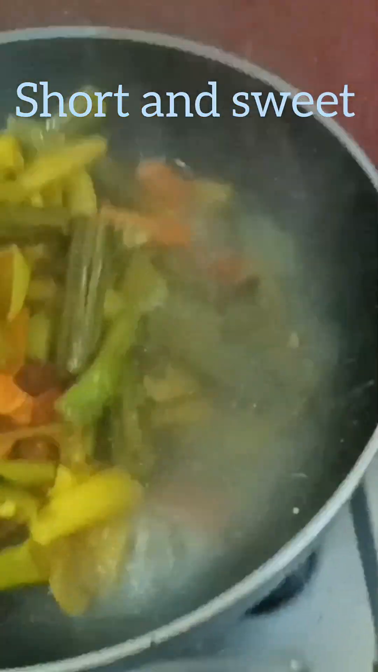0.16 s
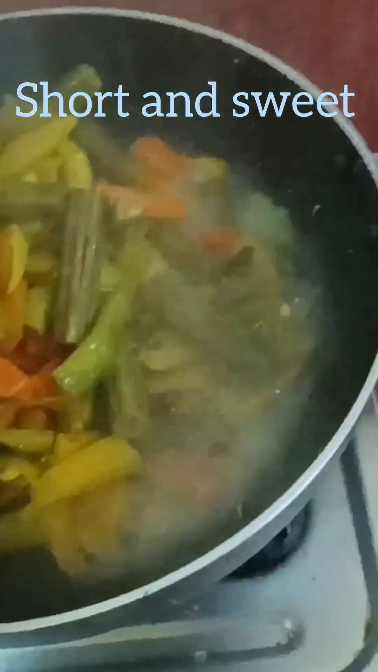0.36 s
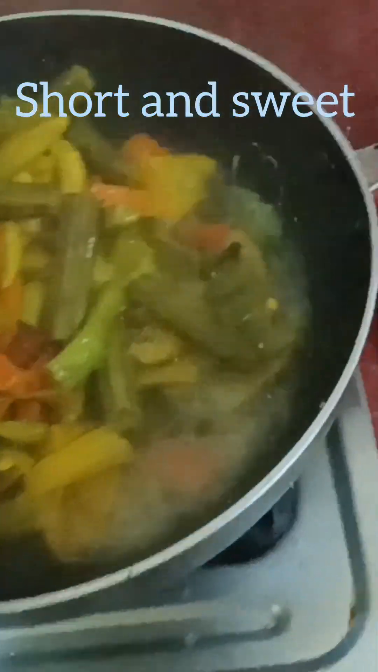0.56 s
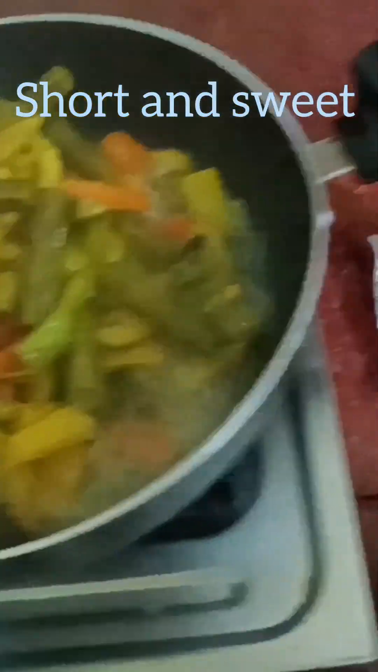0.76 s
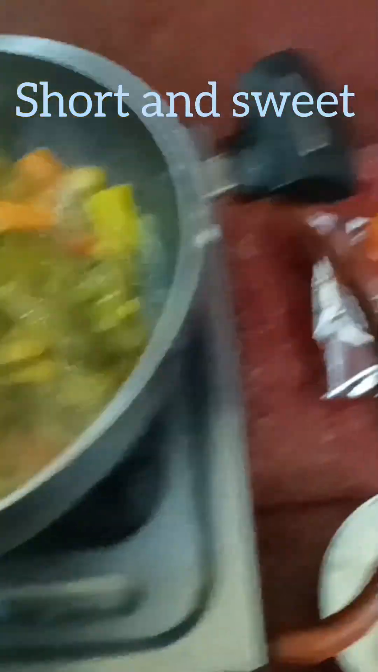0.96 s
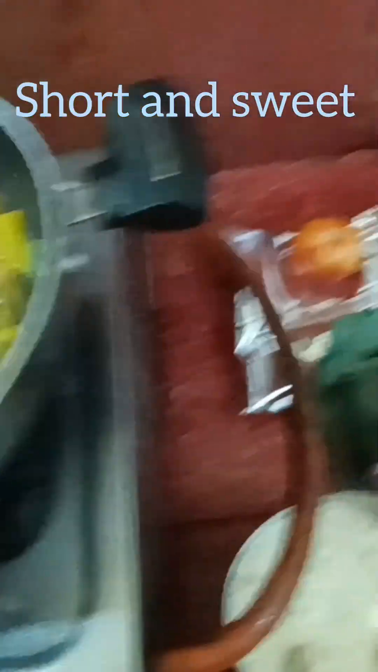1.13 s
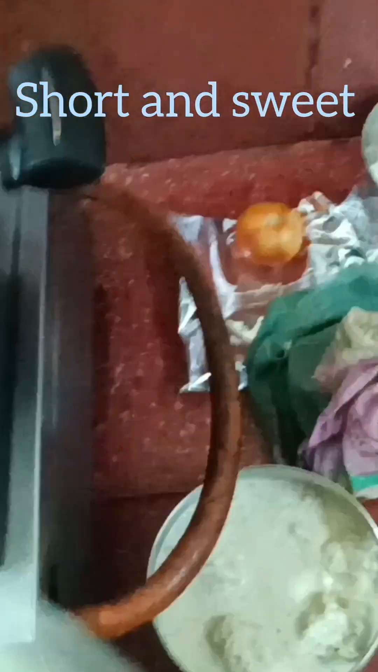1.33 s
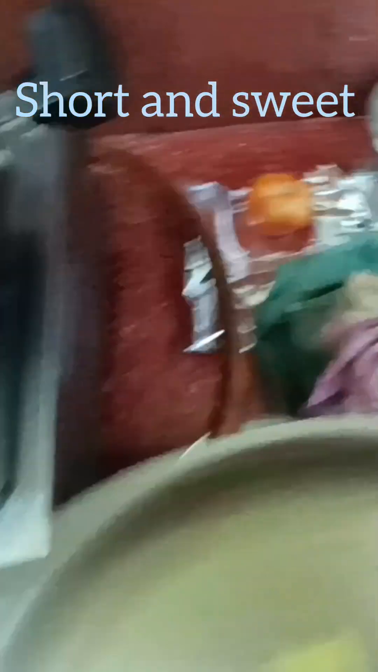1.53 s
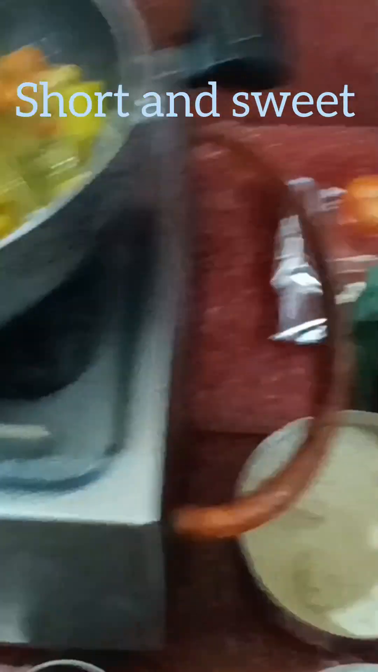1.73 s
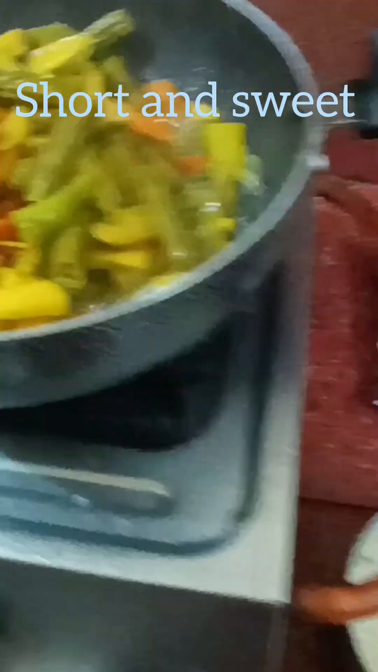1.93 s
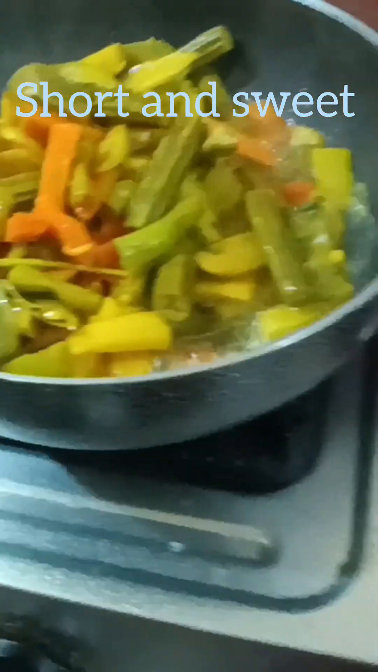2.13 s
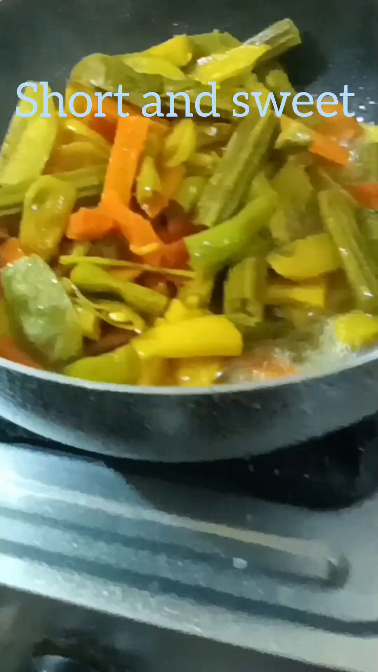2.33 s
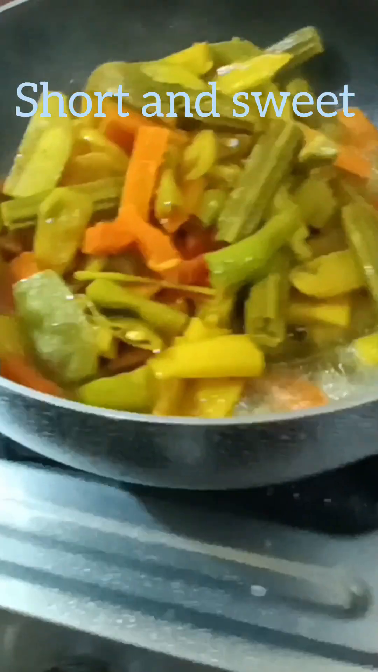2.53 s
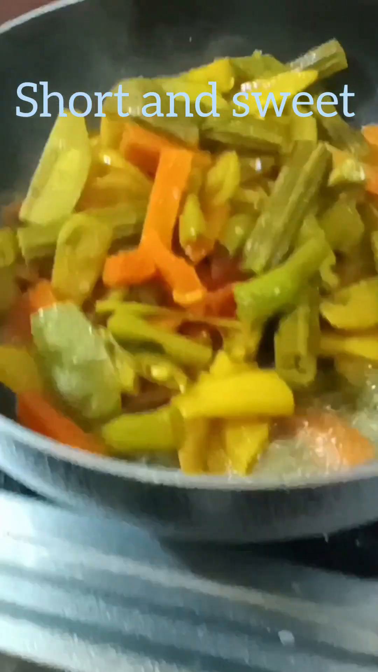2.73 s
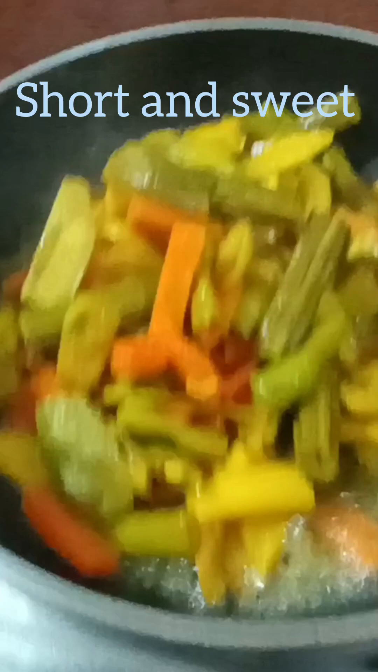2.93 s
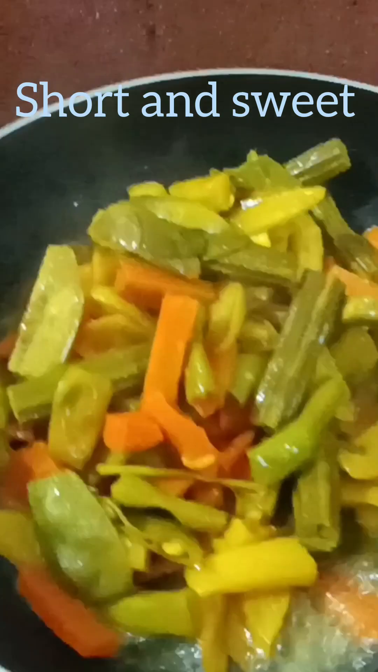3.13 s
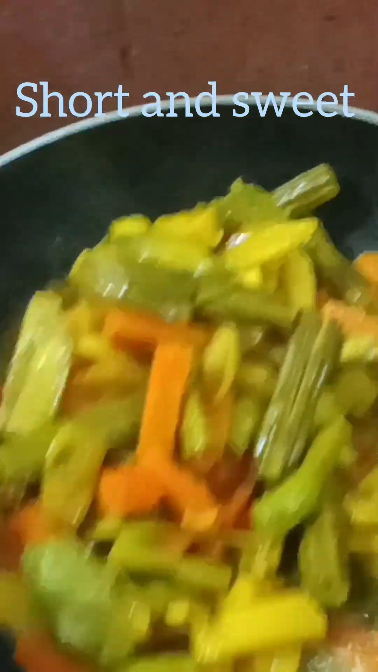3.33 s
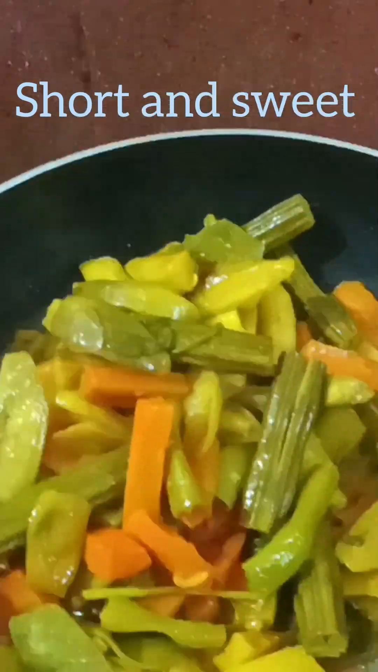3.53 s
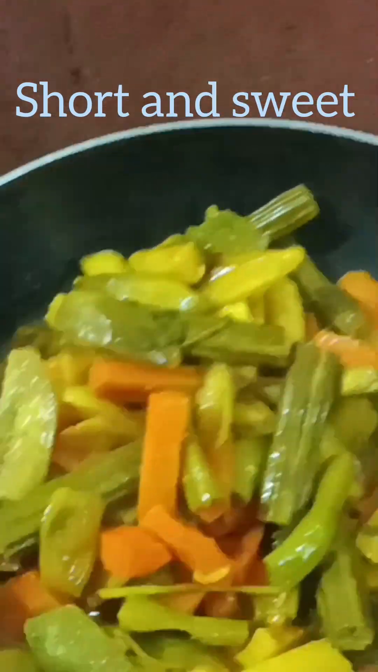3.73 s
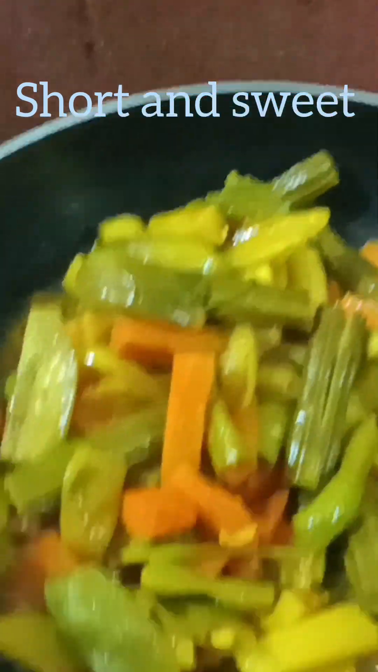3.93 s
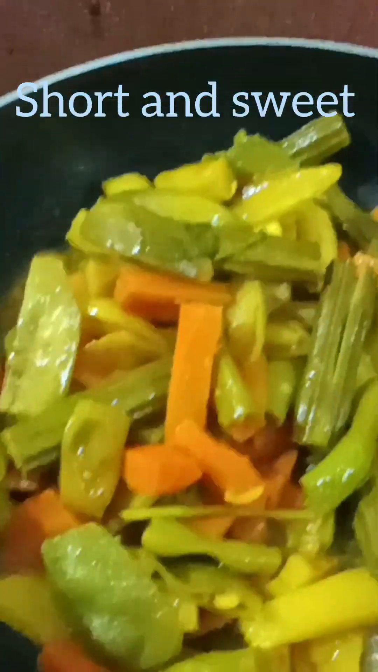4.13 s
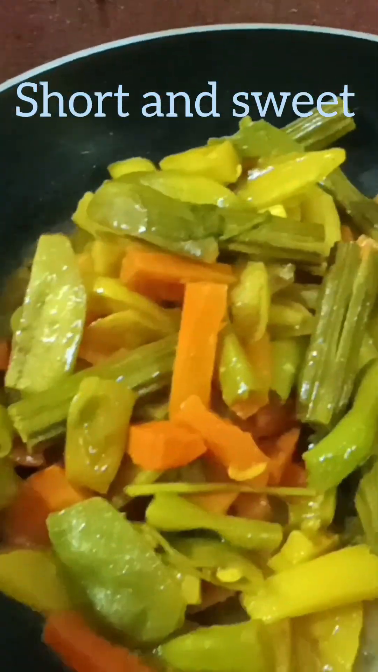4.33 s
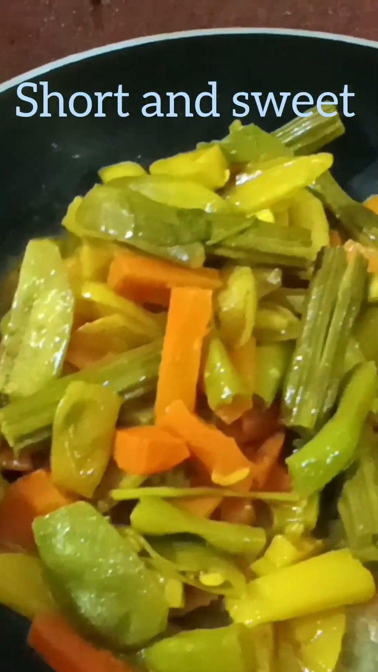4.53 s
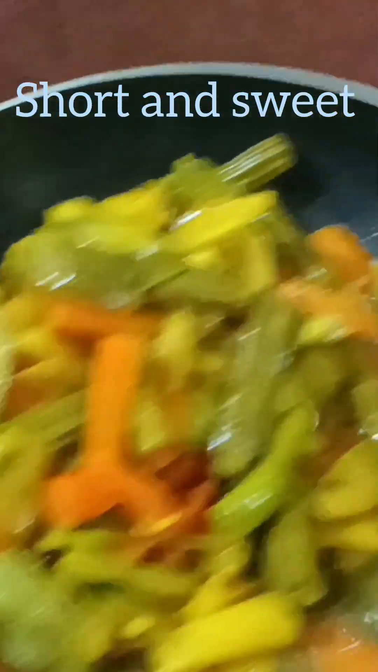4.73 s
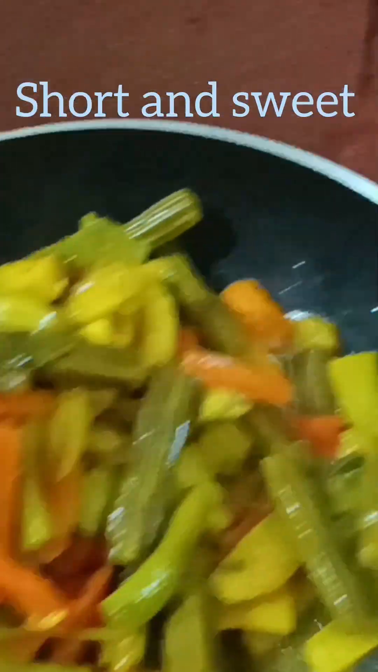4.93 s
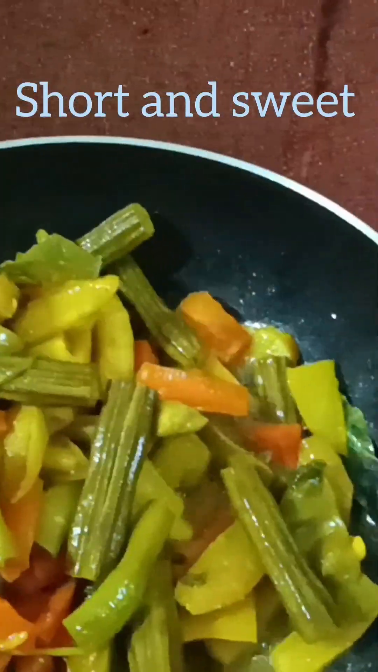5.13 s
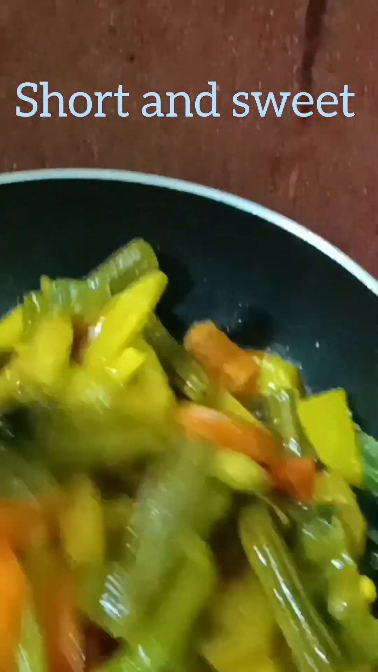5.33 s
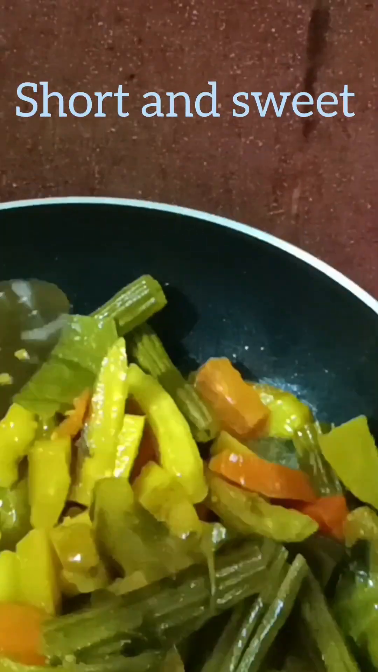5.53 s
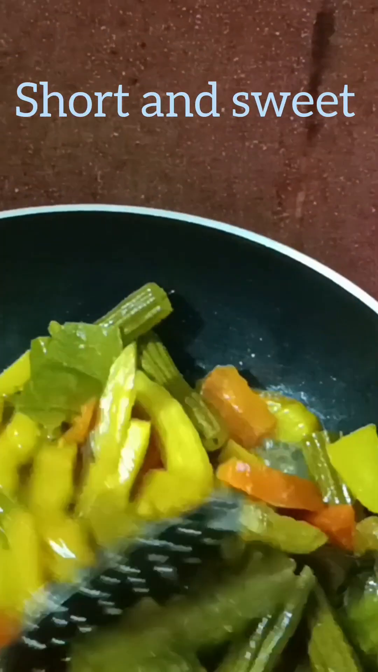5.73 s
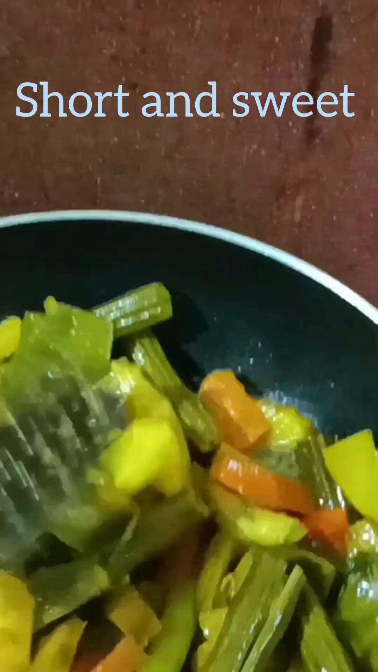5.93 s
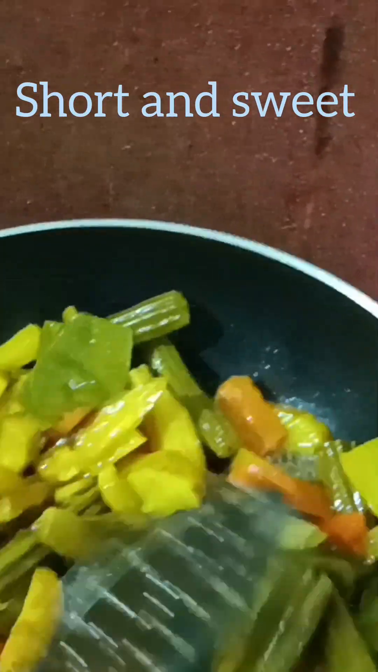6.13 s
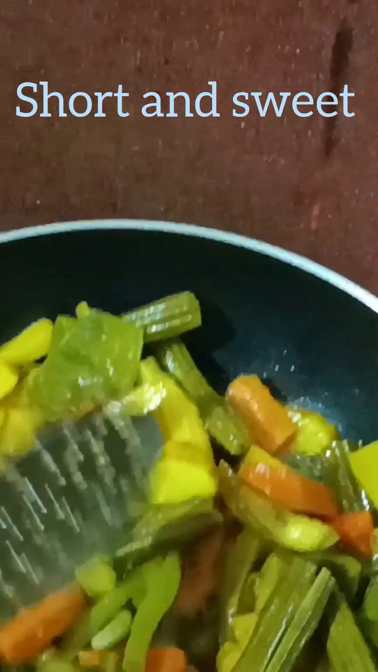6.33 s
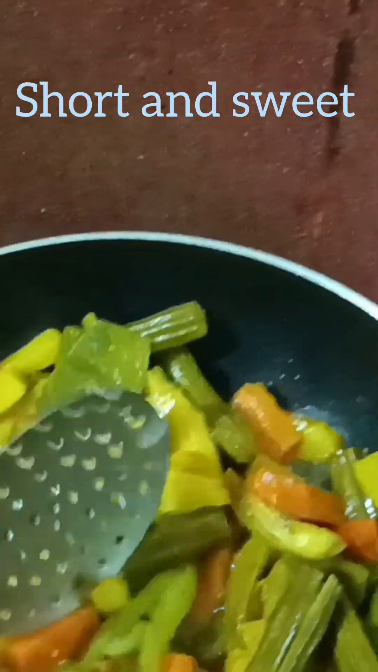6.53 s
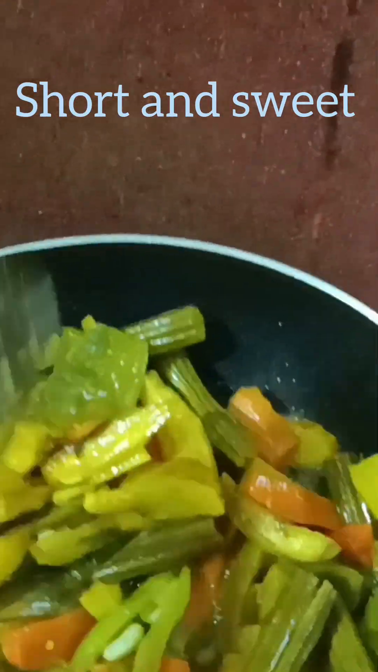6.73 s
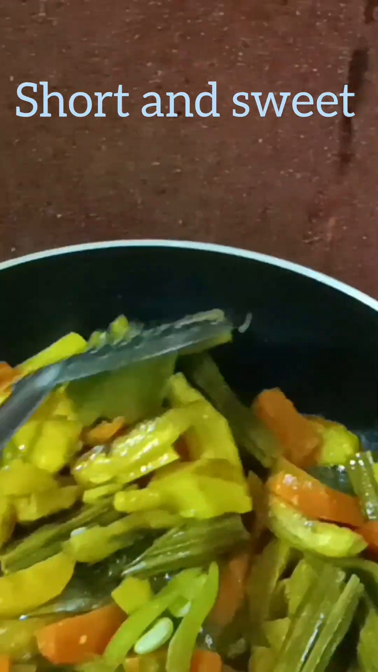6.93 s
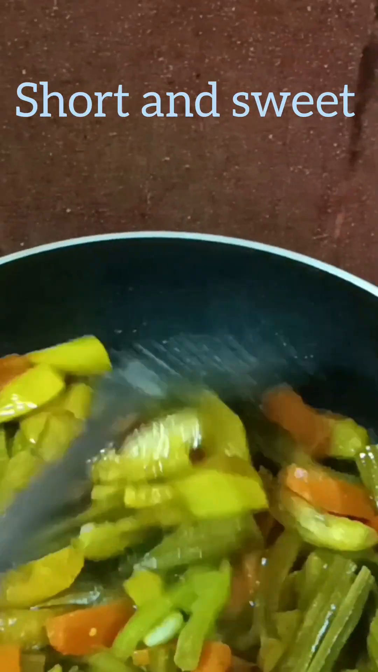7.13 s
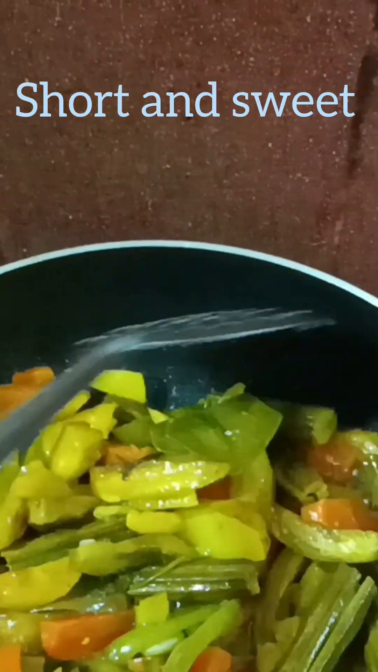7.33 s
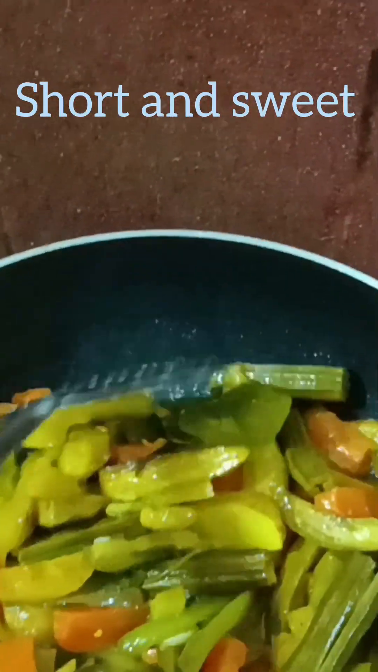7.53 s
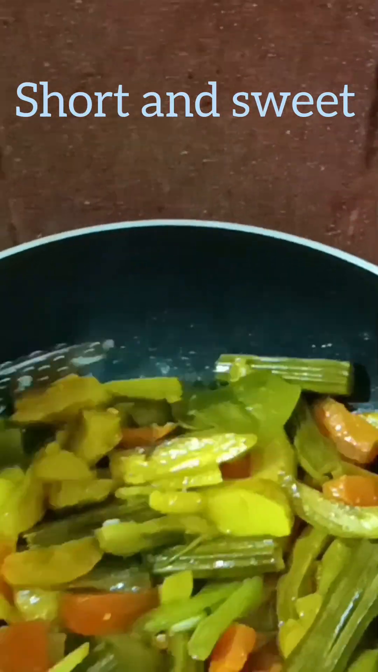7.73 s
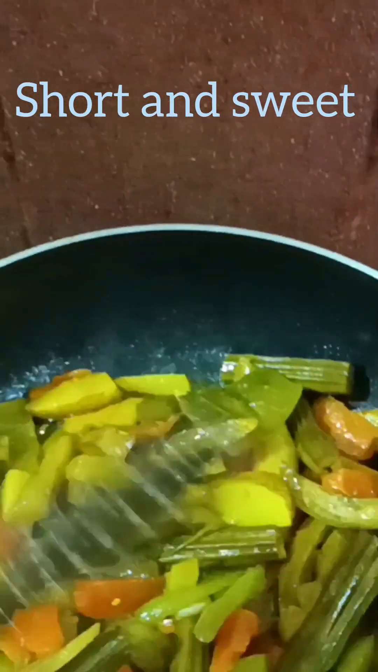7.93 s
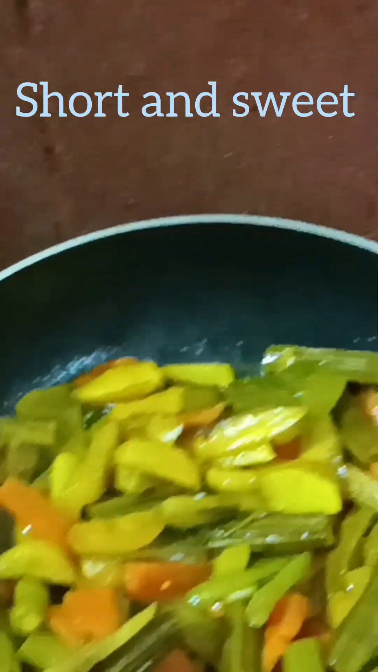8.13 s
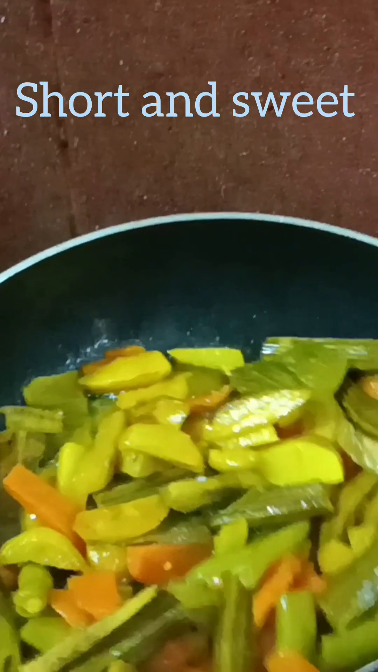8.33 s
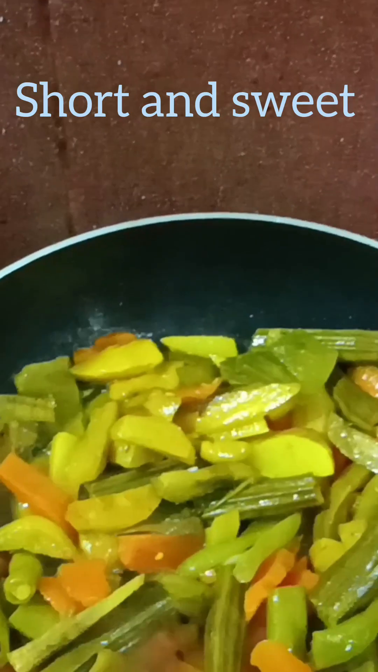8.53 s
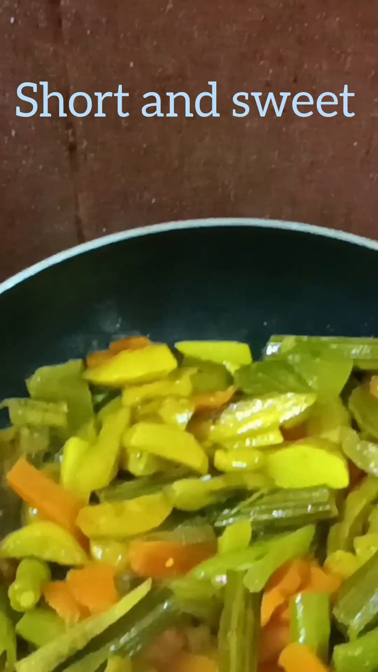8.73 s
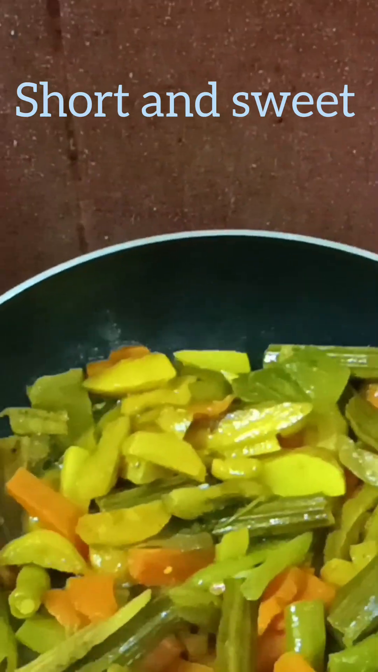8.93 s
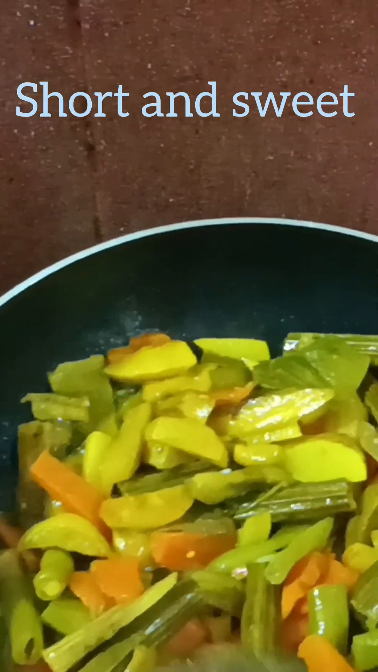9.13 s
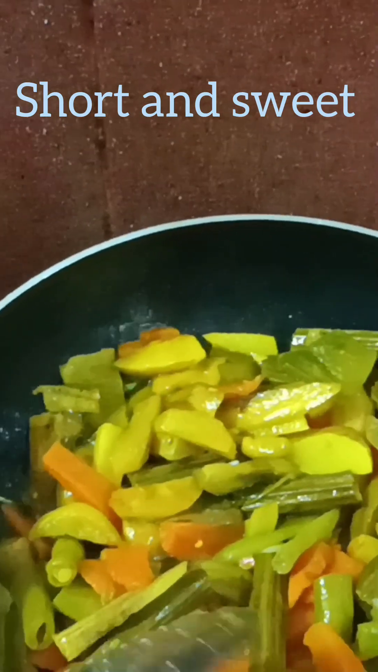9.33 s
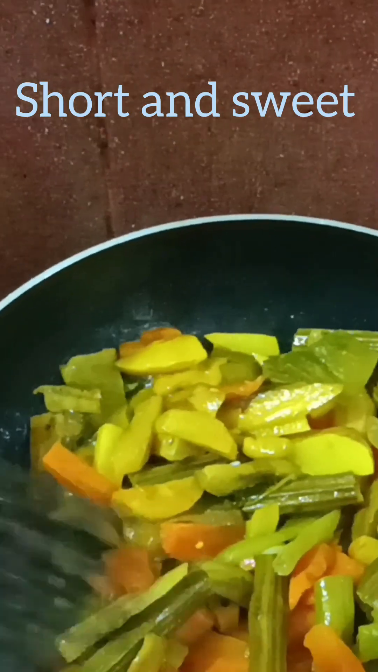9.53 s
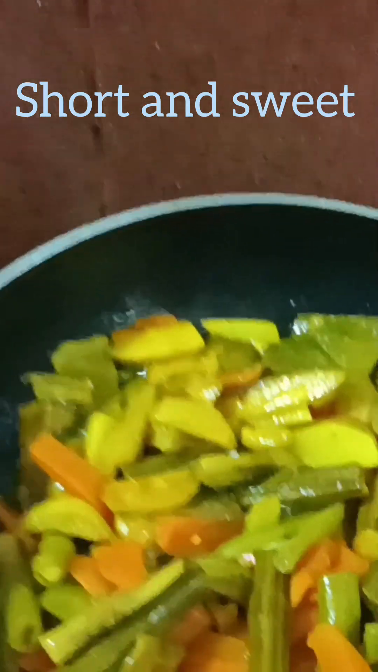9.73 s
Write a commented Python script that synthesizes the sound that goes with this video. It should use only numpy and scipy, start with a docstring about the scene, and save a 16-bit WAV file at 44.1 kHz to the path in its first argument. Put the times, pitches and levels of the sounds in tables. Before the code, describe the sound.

Vegetables sizzle loudly in hot oil, slowly settling, while a spoon knocks and ticks against the rocking pan.

```python
"""Wet vegetables in hot oil, a nonstick pan on a steel gas stove; hand-held stereo mic just above the rim.
Steam bubbles and oil spray open in a fierce sizzle over the burner's low rush; the mic takes the first
of a few bumps. The water boils off and the sizzle settles. From 2 s a slotted spoon knocks the pan,
from 3 s the pan rocks on its support, and then single spits stand out of a sparser crackle.
Stirring turns up a little more water at 4.5 s, and from 5.4 s the spoon's edge ticks sharply."""
import sys
import numpy as np
from scipy import signal
from scipy.fft import rfft, irfft
from scipy.io import wavfile
from scipy.ndimage import uniform_filter1d, minimum_filter1d

SR = 44100
rng = np.random.default_rng(int(sys.argv[2]) if len(sys.argv) > 2 else 0)


def dump(signal):
    """Clip the signal to [-1, 1] and save it as 16-bit WAV at the path in sys.argv[1]."""
    limited = np.clip(np.atleast_2d(signal).T, -1, 1)
    pcm = np.round(limited * 32767).astype(np.int16)
    wavfile.write(sys.argv[1], SR, pcm)


N = 430857
KITCHEN_T60_S = 0.27
OFF_LEFT_DB = np.array([[0], [-13]])  # spits and ticks reach the mic from the left


def from_db(db):
    """Decibels to gain."""
    return 10 ** (np.asarray(db) / 20)


def decay(t, t60):
    """Gain that falls 60 dB in t60 seconds."""
    return from_db(-60 * t / t60)


def rms_one(x):
    """Scale so that the mean of the channels has rms 1."""
    return x / np.sqrt(np.mean(np.atleast_2d(x).mean(0) ** 2) + 1e-20)


def in_time(rows):
    """Each column of a curve, sample by sample."""
    s, *columns = np.transpose(rows)
    return [np.interp(np.arange(N) / SR, s, c) for c in columns]


def add(out, s, sound):
    """Mix a stereo sound in at time s."""
    i = max(0, round(s * SR))
    out[:, i:i + sound.shape[1]] += sound[:, :max(0, N - i)]


def drift(hz):
    """Slow random wander of rms 1."""
    r = np.exp(-80 * np.pi * hz / SR)
    slow = signal.lfilter([1], [1, -2 * r, r * r], rng.standard_normal(N // 40 + 2002))[2000:]
    return np.interp(np.arange(N) / 40, np.arange(len(slow)), rms_one(slow))


def colour(x, spectrum, size=4096):
    """Minimum-phase filter with a left and a right spectrum."""
    hz, *sides = np.transpose(spectrum)
    grid = np.log(np.maximum(np.fft.rfftfreq(size, 1 / SR), 1))
    cepstrum = irfft([np.log(from_db(np.interp(grid, np.log(hz), db))) for db in sides])
    cepstrum[:, 1:size // 2] *= 2
    cepstrum[:, size // 2 + 1:] = 0
    return signal.oaconvolve(x, irfft(np.exp(rfft(cepstrum))), axes=1)[:, :N]


def cut(x, hz, kind, order=4):
    """Butterworth low-, high- or band-pass."""
    return signal.sosfilt(signal.butter(order, hz, kind, fs=SR, output="sos"), x)


def ring(x, hz, t60):
    """A resonance whose energy after a click hardly depends on its t60."""
    r, w = decay(1 / SR, t60), 2 * np.pi * hz / SR
    feed = np.sqrt(1 - r * r) * np.array([1, 0, -1]) / 2
    return signal.lfilter(feed, [1, -2 * r * np.cos(w), r * r], x + 1e-18)


def diffuse(x, t60, wet_db):
    """Sources scattered over the pan all echo differently, so their tails merge into smooth noise."""
    r = from_db(-120 / (t60 * SR))
    energy = signal.lfilter([1 - r], [1, -r], np.mean(x ** 2, axis=0) + 1e-18)
    return x + from_db(wet_db) * np.sqrt(energy) * rng.standard_normal((2, N))


def bursts(per_s, pitches, spread_db, cycles, crack):
    """Bubbles burst at random: each is a crack and a brief ring at its own pitch; big ones are rare."""
    at = np.flatnonzero(rng.random(N) < per_s / SR)
    sizes = from_db(spread_db * np.minimum(rng.exponential(1, N), 5.5))[at]
    sizes *= rng.choice([-1, 1], N)[at]
    pitch_index, out = rng.integers(0, len(pitches), N)[at], np.zeros((2, N))
    for k, hz in enumerate(pitches):
        clicks = np.zeros(N)
        clicks[at[pitch_index == k]] = sizes[pitch_index == k]
        pop = ring(clicks, hz, cycles / hz) + crack * clicks
        # every spot in the pan has its own path; the left port hears it about 1 ms later
        out += [np.roll(pop, rng.integers(30, 62)), pop]
    return out


def pings(per_s, t60, spread_db, low_hz=750, high_hz=9000):
    """Bubbles in the juice ring briefly, each at a pitch of its own."""
    out, t = np.zeros((2, N)), np.arange(SR // 28) / SR
    for when, pitch, size, life, phase in rng.random((int(per_s * N / SR), 5)):
        hz = low_hz * (high_hz / low_hz) ** pitch ** .7
        turns = hz * t + np.array([[0], [phase]])
        # higher bubbles ring louder; strong ones are rare
        height = np.sqrt(hz) * from_db(-spread_db * np.log(size + 0.015))
        add(out, when * N / SR, height * np.sin(2 * np.pi * turns) * decay(t, t60 * (.5 + life)))
    return out


def crackle(bursts_per_s=28000, cooling_s=6.3):
    """Bursts and pings in the kitchen's echo, held at an even level; bursts thin out as the pan cools."""
    per_s = bursts_per_s * np.exp(-np.arange(N) / SR / cooling_s) * from_db(.8 * drift(25))
    pops = bursts(per_s, np.linspace(1500, 15500, 36), spread_db=4.0, cycles=30, crack=.55)
    pops = rms_one(diffuse(pops, t60=.03, wet_db=-4))
    juice = from_db(-8) * rms_one(pings(per_s=800, t60=.05, spread_db=2.1))
    grains = diffuse(pops + juice, KITCHEN_T60_S, wet_db=-3.0)
    return grains / np.sqrt(uniform_filter1d(np.mean(grains ** 2, axis=0), SR // 6) + 1e-12)


def fresh_water(boil_off_s=0.94, stir_s=4.54, rise_s=.15, dry_s=6.0):
    """Share of fresh water in the pan, 0-1: most boils off at once, stirring brings some back."""
    t = np.arange(N) / SR
    stirred = np.maximum(t - stir_s, 0)
    turned_up = .2 * (1 - np.exp(-stirred / rise_s)) * np.exp(-stirred / dry_s)
    return np.clip(1 / (1 + (t / boil_off_s) ** 4) + turned_up, 0, 1)


# sizzle colours at the rim, with fresh water, hollower, and settled: f/Hz, left/dB, right/dB
WET_COLOUR = [(460, -31, -31.5), (750, -20, -13), (1440, -16, -25.5), (2220, -12, -21.5), (2650, -8, -23),
              (3250, -3, -22), (4180, -3.5, -15), (4970, -16, -23), (5340, -8.5, -15), (6570, -0.5, -19.5),
              (8200, -8, -33), (9800, -9.5, -11), (11000, -16, -7), (12900, -40, -19), (13540, -13, -22),
              (15300, -31, -11.5)]
HOLLOW_COLOUR = [(457, -30, -36.5), (844, -17.5, -24.5), (1410, -12.5, -25.5), (2300, -13.5, -9),
                 (2580, 1, -27), (3250, 0.5, -17), (3970, -9.5, -22.5), (4530, -16, -15), (5670, -8, -14.5),
                 (6700, -3.5, -19), (8800, -7, -24), (9550, -6, -11.5), (11340, -16.5, -6),
                 (12600, -31, -19), (13750, -17.5, -36), (14700, -10.5, -13)]
SETTLED_COLOUR = [(438, -27, -32.5), (830, -15, -18.5), (1470, -17.5, -18), (2320, -8, -33.5),
                  (2630, -10, -33), (3250, 0, -20), (4190, -11.5, -25), (4370, -13.5, -27.5),
                  (5930, -5, -21), (6780, 2.5, -29), (8600, -6, -17), (9000, -4, -26), (10750, -30, -6.5),
                  (12300, -17, -21), (13500, -25, -25), (15800, -12, -19)]
# share of the hollower sizzle colour: t/s, share/0-1
HOLLOW_SHARE = [(0, 0), (.45, 0.18), (1.0, 0.28), (1.3, 0.89), (1.7, 0.4), (2.6, .7), (3.5, 0.35),
                (8.6, 0.27), (9.77, .5)]
# loudness just above the rim: t/s, steam bubbles/dB, fine oil spray/dB
SIZZLE_LEVELS = [(0, -22.5, -25.5), (0.4, -26, -24), (0.75, -26.5, -24.0), (1.07, -29, -24.5),
                 (1.22, -27.5, -26.5), (1.45, -28.5, -26.5), (1.68, -29.5, -26.5), (2.15, -28.5, -29.5),
                 (2.9, -28, -28), (3.5, -29.5, -27.5), (4.4, -29.0, -30), (4.9, -31.5, -28.5),
                 (5.9, -32, -28.5), (6.6, -33, -28.5), (7.7, -35.0, -31.5), (8.9, -35, -33),
                 (9.77, -35.5, -34.5)]
def sizzle(surge_db=0.48, surge_hz=4.8):
    """Steam bubbles and finer oil spray; the colour shifts as water boils off and is hollower at times."""
    bubbles_db, spray_db = in_time(SIZZLE_LEVELS)
    water, hollow = fresh_water(), in_time(HOLLOW_SHARE)[0]
    settled = np.clip(1 - water - hollow, 0, 1)
    grains = crackle()
    blend = [(water, WET_COLOUR), (hollow, HOLLOW_COLOUR), (settled, SETTLED_COLOUR)]
    hiss = cut(sum(share * rms_one(colour(grains, tone)) for share, tone in blend), 568, "high")
    # the pan's upper modes ring along faintly, and larger bubbles blip in the juice
    pan_ring = sum(from_db(db) * ring(grains, hz, t60) for hz, db, t60 in PAN_MODES[8:])
    blips = pings(per_s=70, t60=0.084, spread_db=1.5, low_hz=680, high_hz=2200)
    bubbles = rms_one(cut(hiss, 4820, "low")) + from_db(-19.5) * rms_one(pan_ring)
    bubbles = rms_one(bubbles) + from_db(-20) * rms_one(blips)
    spray = rms_one(cut(hiss, 5730, "high"))
    surge = from_db(surge_db * drift(surge_hz))
    return (bubbles * from_db(bubbles_db) + spray * from_db(spray_db)) * surge


# colour of the rush round the burner, below the mic: f/Hz, left/dB, right/dB
RUSH_COLOUR = [(20, 1.5, -2), (50, -10, 0.5), (80, 6, 7), (108, -1.5, -17.5), (160, -1, -1.5),
               (303, -3.5, -6.5), (613, -8.5, -6), (1510, -56, -48)]
def burner(flame_db=-57.5, sink_db_per_s=0.86, steam_db=17, steam_s=.7):
    """Low rush of flame and rising steam: strong while steam pours off, then sinking slowly."""
    t = np.arange(N) / SR
    level_db = flame_db - sink_db_per_s * t + steam_db * np.exp(-t / steam_s)
    return from_db(level_db) * rms_one(colour(rng.standard_normal((2, N)), RUSH_COLOUR))


# handling, right on the mic: t/s, push on the left port, push on the right port, upper edge/Hz
MIC_BUMPS = [(0.105, .06, .0, 200), (0.392, 0.24, 0.12, 230), (3.153, -.8, 0.026, 340),
             (5.401, .0, 1.9, 656), (5.451, .0, -1.7, 455), (5.857, .0, .06, 250),
             (7.492, .16, -0.015, 400)]
def mic_bumps(relax_s=0.0065, port_hz=66):
    """A pressure step on a port leaks away in a few milliseconds; softer touches are duller."""
    out, t = np.zeros((2, N)) + 1e-18, np.arange(SR // 10) / SR
    for s, left, right, edge_hz in MIC_BUMPS:
        thud = cut(np.exp(-t / relax_s), edge_hz, "low", order=3)
        add(out, s, np.outer([left, right], thud))
    return cut(out, port_hz, "high", order=1)


def kitchen(wet_db=-3.0):
    """Impulse response from pan to mic: direct sound and a diffuse tail, different at each port."""
    t = np.arange(SR // 2) / SR
    tail = rng.standard_normal((2, len(t))) * decay(t, KITCHEN_T60_S) * (1 - np.exp(-t / 0.0049))
    return (t == 0) + from_db(wet_db) * tail / np.sqrt(np.sum(tail ** 2, axis=1, keepdims=True))


# modes of the loaded pan: f/Hz, level/dB, t60/s before a contact's damping
PAN_MODES = [(88.9, 3, 0.63), (124, -14, 0.26), (179, -4, 0.45), (236, -2, 0.15), (269.8, -3.5, 0.35),
             (303.3, 2, 0.21), (361.7, -1.5, 0.47), (444.8, 2.5, 0.43), (517, -11.5, 0.12),
             (601.2, -1.5, 0.41), (704, 2, 0.19), (798, 4, 0.18), (890, -5, 0.24), (955, 1, 0.096),
             (1005.6, 2, 0.074), (1069.6, 3.5, 0.14), (1240, 0, 0.024), (1300, 0, 0.033), (1392, 2.5, 0.17),
             (1440, -27, 0.14), (1580, -28, 0.41), (2083, -1, 0.1)]
def strike(centre_hz, octaves, damping, rise_s, drag_s, chatter=0.36):
    """A contact favours the modes round one pitch and feeds them while it drags; then they die. Peak 1."""
    hz, db, t60 = np.transpose(PAN_MODES)[:, :, None]
    t = np.arange(SR // 4) / SR
    off_centre = np.log2(hz / centre_hz) / octaves
    strength = from_db(db + rng.normal(0, 0.64, hz.shape)) / (1 + off_centre ** 2) ** 2
    modes = strength * decay(np.maximum(t - drag_s, 0), t60 / damping) * (1 - np.exp(-t / rise_s))
    # the contact chatters, and the shifting load detunes the pan a little from touch to touch
    modes *= 1 + chatter * rms_one(cut(rng.standard_normal(len(t)), 66, "low", order=2))
    hz = hz * (1 + 0.017 * rng.standard_normal(hz.shape))
    phases = rng.random((2, *hz.shape))
    direct = np.sum(modes * np.sin(2 * np.pi * (hz * t + phases)), axis=1)
    sound = signal.fftconvolve(direct, kitchen(), axes=1)[:, :len(t)]
    sound *= 1 - (t / t[-1]) ** 4
    return sound / np.abs(sound).max(axis=1, keepdims=True)


def scrape(band_hz=(500, 2000), length_s=0.035):
    """The spoon's edge drags over the coating: a short, gritty rasp."""
    t = np.arange(SR // 4) / SR
    grit = rng.standard_normal((2, len(t))) ** 3
    return rms_one(cut(grit, band_hz, "band", order=2)) * np.exp(-(t / length_s) ** 2)


# spoon on the pan, close under the mic; levels are relative:
# t/s, wall level/dB, wall centre/Hz, body level/dB, body centre/Hz, drag/s
SPOON_KNOCKS = [(1.985, -22.5, 1000, -66, 433, 0.027), (2.047, -26.5, 873, -67, 525, .02),
                (2.447, -23, 1300, -45.5, 353, 0.023), (2.519, -30, 1310, -42.5, 337, 0.052),
                (5.131, -34.5, 1000, -44, 264, 0.038), (5.609, -22.5, 1025, -45.5, 477, 0.02),
                (7.203, -36, 1250, -43.5, 238, .026), (7.497, -28.5, 1090, -33.5, 260, 0.036),
                (7.94, -24.5, 1420, -39, 365, 0.037), (8.373, -44, 970, -52, 292, 0.079),
                (8.588, -41.5, 1100, -48, 370, 0.057), (9.027, -35, 1250, -29.5, 210, .022),
                (9.207, -21.5, 1220, -36.5, 346, 0.036)]
def spoon_knocks():
    """Each knock rings the pan's wall, a little left of centre, and its body, with a brief scrape."""
    out = np.zeros((2, N))
    for s, wall_db, wall_hz, body_db, body_hz, drag_s in SPOON_KNOCKS:
        wall = strike(wall_hz, octaves=0.25, damping=1.8, rise_s=0.0006, drag_s=drag_s, chatter=0.25)
        add(out, s, from_db(wall_db + np.array([[3.5], [0]])) * wall)
        add(out, s, from_db(body_db - 8.5) * scrape())
        body = strike(body_hz, octaves=1.0, damping=1.5, rise_s=0.0022, drag_s=drag_s, chatter=0.41)
        add(out, s, from_db(body_db + 10.5) * body)
    return out


# the pan tips on its support, centred below the mic: t/s, level/dB
PAN_TIPS = [(3.177, -19), (3.459, -29.5), (3.699, -26), (3.775, -30), (3.924, -25), (4.053, -24.5),
            (4.15, -30.5), (4.239, -39), (5.133, -35.5), (8.031, -41)]
def pan_rocks(fall_back_s=.031, fall_back_db=-2.5):
    """The pan tips and falls back; each contact wakes mainly one low mode, and faintly its octave."""
    out = np.zeros((2, N))
    for tip_s, tip_db in PAN_TIPS:
        for s, db in [(tip_s, tip_db), (tip_s + fall_back_s, tip_db + fall_back_db)]:
            low = strike(298, octaves=0.3, damping=1.7, rise_s=0.0016, drag_s=0.032)
            octave = strike(590, octaves=0.22, damping=1.3, rise_s=.01, drag_s=0.042)
            add(out, s, from_db(db) * low + from_db(db - 19.5) * octave)
    return out


def spits(from_s=3.8, per_s=5, peak_db=-12, spread_db=3, band_hz=(3220, 9100), t60=0.0042):
    """Droplets burst in the oil once the sizzle has settled: dry, very short cracks at random moments."""
    out, t = np.zeros((2, N)), np.arange(SR // 50) / SR
    span_s = N / SR - from_s
    for when, size in rng.random((int(per_s * span_s), 2)):
        crack = cut(rng.standard_normal((2, len(t))) * decay(t, t60), band_hz, "band", order=2)
        db = peak_db + spread_db * (2 * size - 1) + OFF_LEFT_DB
        add(out, from_s + when * span_s, from_db(db) * crack / np.abs(crack).max())
    return out


# the spoon's edge, close on the left: t/s, relative level/dB, f/Hz, ring t60/s
EDGE_TICKS = [(5.440, -5.5, 6600, .04), (6.698, -7.5, 6000, .06), (6.708, -8, 6960, .06),
              (7.204, -7, 6500, .05), (7.493, -8, 11100, 0.16), (7.494, -7, 5580, 0.26),
              (7.498, -7, 6100, .12), (7.928, -6.5, 6600, .04), (7.931, -10, 3250, .11),
              (8.027, -5.5, 6000, 0.062), (8.319, -7, 6090, 0.045), (8.383, -10, 3520, 0.058),
              (8.573, -8, 6160, 0.072)]
def spoon_ticks(snap_t60=0.057, crack_t60=0.044, crack_top_hz=13700):
    """The edge ticks: a bright crack, with a hard snap and a thinner ring that share one pitch."""
    out, t = np.zeros((2, N)), np.arange(SR // 8) / SR
    for s, db, hz, t60 in EDGE_TICKS:
        noise = cut(rng.standard_normal((2, len(t))), [0.8 * hz, crack_top_hz], "band", order=2)
        crack = noise * decay(t, crack_t60)
        tone = np.sin(2 * np.pi * hz * t) * (decay(t, snap_t60) + 0.25 * decay(t, t60))
        add(out, s, from_db(db + OFF_LEFT_DB) * (0.4 * tone + 0.28 * crack))
    return out


def scene():
    """Everything at the mic's two ports, just above the rim."""
    return sizzle() + spoon_ticks() + spoon_knocks() + pan_rocks() + mic_bumps() + burner() + spits()


def record(dry, ceiling_db=-2.0, release_db_per_s=75, ahead_s=0.03, top_hz=15900):
    """A look-ahead limiter ducks both channels under the hardest bumps; the top is cut."""
    over_db = np.maximum(20 * np.log10(np.abs(dry).max(axis=0) + 1e-9) - ceiling_db, 0)
    fall_db = release_db_per_s * np.arange(N) / SR
    held_db = np.maximum.accumulate(over_db + fall_db) - fall_db
    ahead = int(ahead_s * SR)
    duck_db = uniform_filter1d(-minimum_filter1d(-held_db, ahead), ahead)
    top_cut = signal.ellip(12, .1, 80, top_hz, fs=SR, output="sos")
    return signal.sosfilt(top_cut, dry * from_db(-duck_db))


dry = scene()
out = record(dry)
dump(out)
```